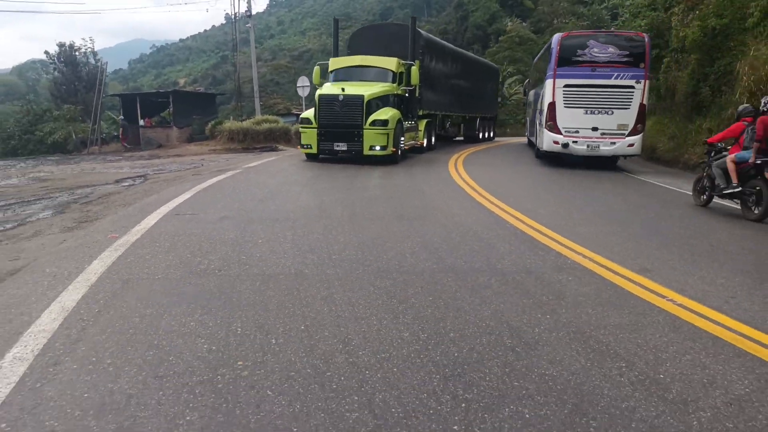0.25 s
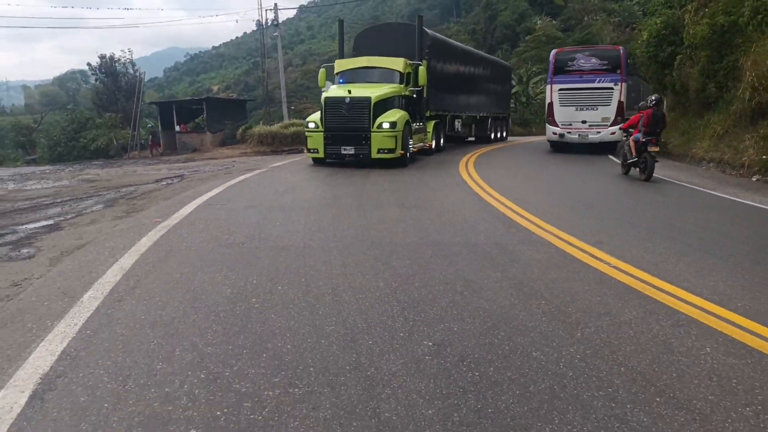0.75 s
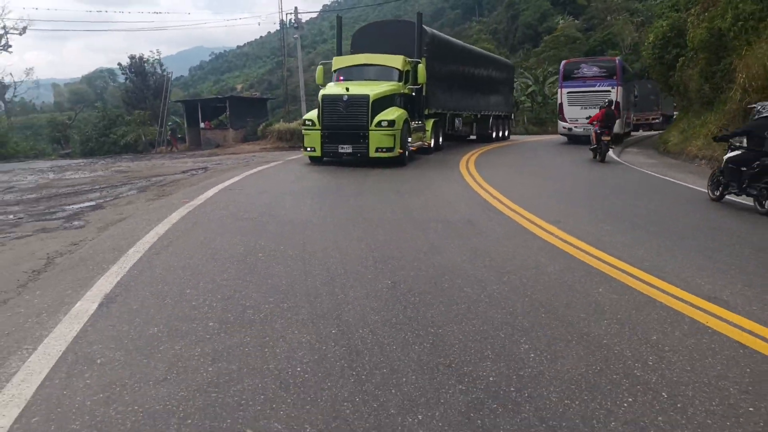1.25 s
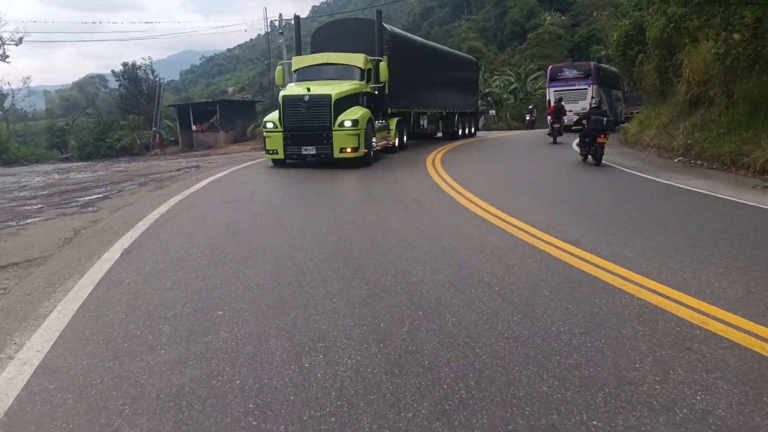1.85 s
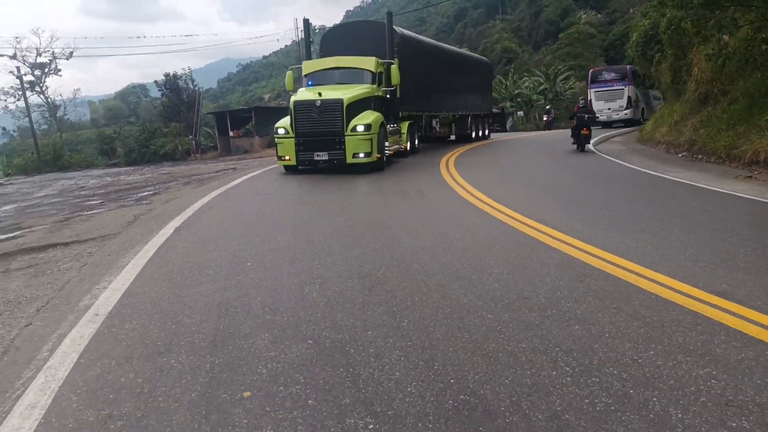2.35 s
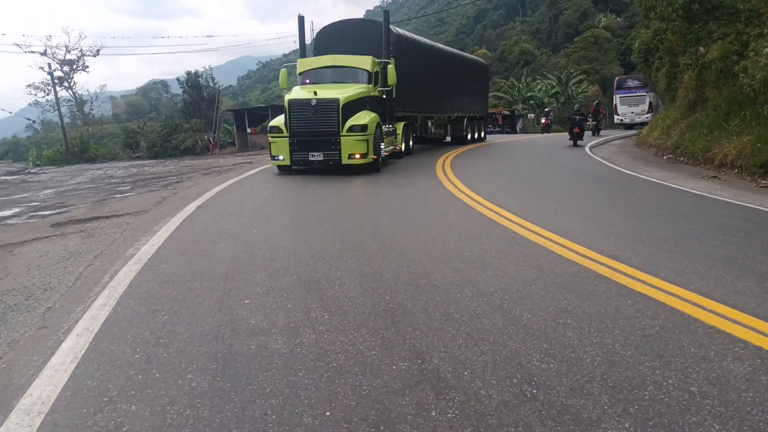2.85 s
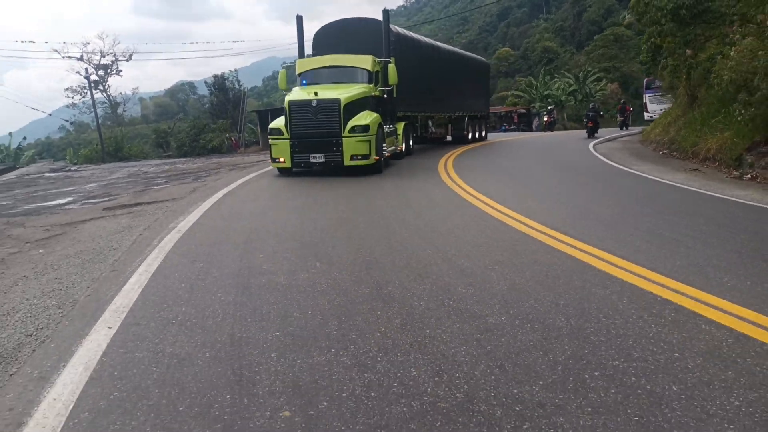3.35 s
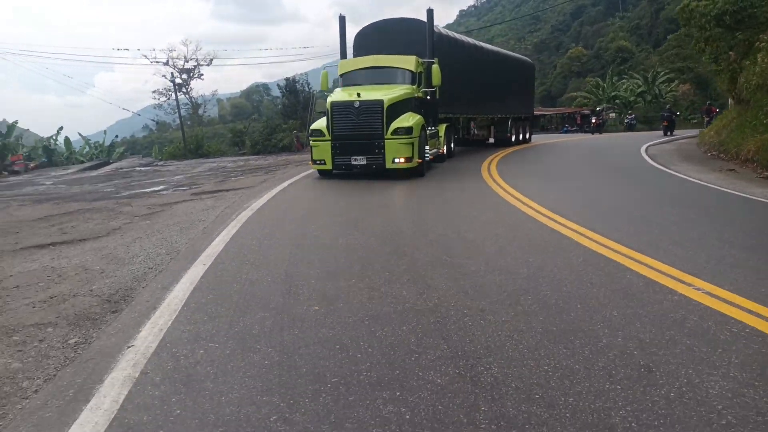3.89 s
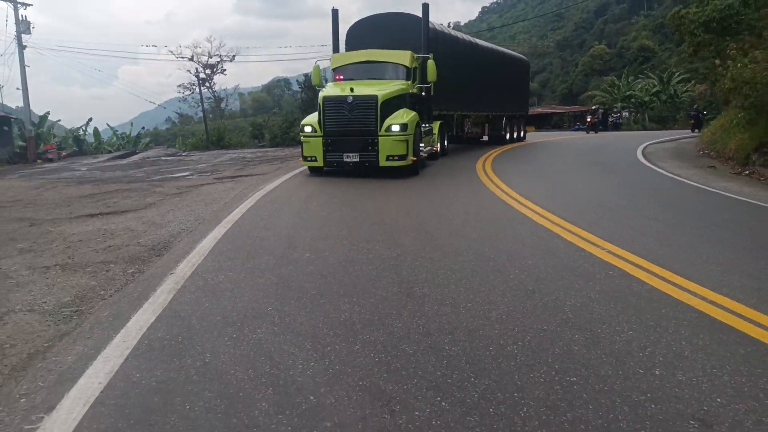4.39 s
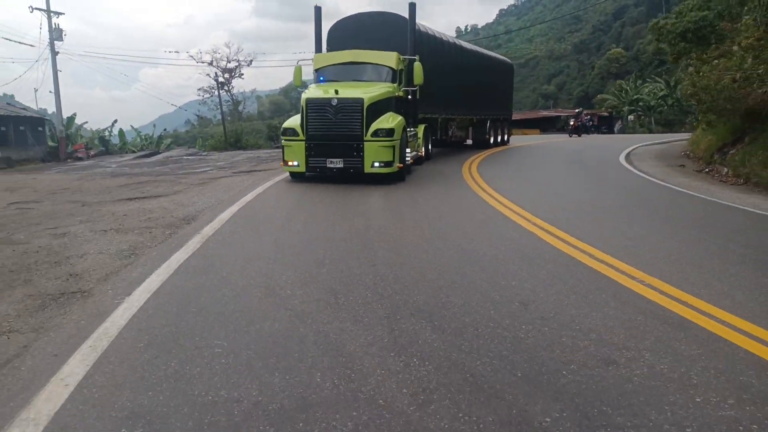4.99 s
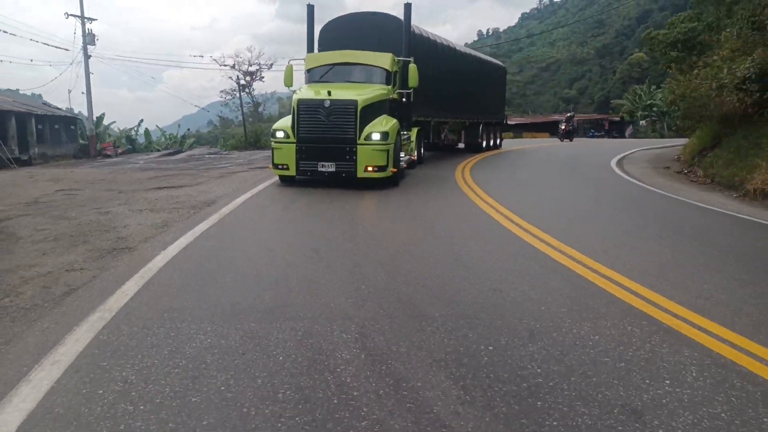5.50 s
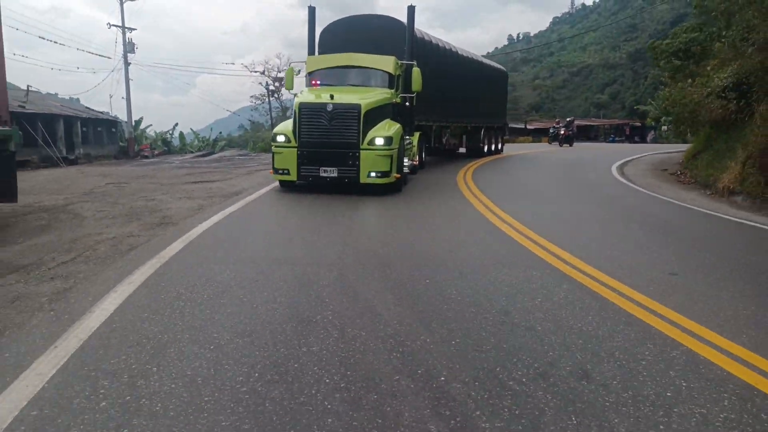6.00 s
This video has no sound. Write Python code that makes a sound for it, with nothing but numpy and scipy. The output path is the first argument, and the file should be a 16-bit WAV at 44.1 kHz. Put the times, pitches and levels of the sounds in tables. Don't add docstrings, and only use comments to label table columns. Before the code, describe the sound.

Outdoors on a mountain road, a loaded diesel truck labours slowly toward a roadside microphone. A coach roars away and two motorbikes buzz past early, then fade. The truck's deep drone and knocking rise steadily in pitch and loudness, with faint turbo whistle and trailer squeaks. Near the end the driver lifts off, air vents with a hiss, a gear clacks, and the engine sags into lumpy gulps.

```python
import sys
import numpy as np
from scipy import signal
from scipy.fft import rfft, irfft
from scipy.io import wavfile
from scipy.ndimage import uniform_filter1d

SR = 44100
rng = np.random.default_rng(int(sys.argv[2]) if len(sys.argv) > 2 else 0)


def unload_wav(signal):
    wavfile.write(
        sys.argv[1],
        SR,
        np.round(np.clip(np.atleast_2d(signal).T, -1, 1) * 32767).astype(np.int16),
    )


def makeup_ratio(level_db):
    decades = np.asarray(level_db, float) / 20
    return 10 ** decades


N = 275184

# (frequency [Hz], density [dB per Hz])
HISS = [(1760, -28.5), (3000, -8), (3370, -25), (4260, -5.5), (5170, -8), (7240, -6), (7870, -6.5),
        (9410, -15), (12800, -15), (15600, -20.5)]
# (frequency [Hz], density [dB per Hz])
RUMBLE = [(15, -50), (25, -40), (54, -46), (92, -1.5), (112, -1.5), (237, -15.5), (362, -16), (492, -19.5),
          (600, -9.5), (780, -46), (1320, -120)]
# (frequency [Hz], density [dB per Hz])
COACH = [(200, 5.5), (300, -1), (420, 1.5), (560, 3.5), (700, -1), (950, 0.5), (1150, -6), (1700, -3),
         (3000, -73), (4000, -85)]
# (frequency [Hz], density [dB per Hz])
TRAFFIC = [(700, -25), (1500, -20), (2300, 11.5), (2900, 10), (3250, 4.5), (3600, 6), (4500, -1.5),
           (6000, -10.5), (10000, -13), (15000, -19)]
# (time of pass [s], level there [dB], time to cover the passing distance [s])
BIKE_PASSES = [
    (.15, -40, 0.39),
    (.65, -42, 0.42),
    (1.13, -43, 0.094),
    (1.55, -46.5, 0.18),
]
# (time [s], frequency [Hz], level [dB])
BIKE_TONES = [
    [(0, 133.5, -41), (.65, 130.7, -31), (.9, 128.9, -58)],
    [(.8, 223.5, -60), (1.1, 222, -42), (1.6, 220, -34.5), (2.0, 217.2, -55)],
]
# (time [s], level [dB], frequency [Hz])
SQUEAKS = [(0.514, -47, 8500), (0.645, -50, 9500), (2.232, -52, 8100), (2.7, -46, 8200), (2.852, -62, 8200),
           (3.02, -60, 8400), (3.165, -52, 8260), (3.28, -58, 8165), (3.41, -57, 8100), (3.52, -54, 8200),
           (5.978, -54, 10200), (6.16, -54, 10200), (6.234, -53, 8500)]
# (time [s], level [dB], frequency [Hz], length [s])
SWISHES = [
    (0.977, -56, 11900, .03),
    (1.13, -59, 12000, .14),
    (1.563, -58, 11970, .07),
    (1.667, -58, 8807, .16),
    (2.2, -58, 12000, .06),
    (5.968, -76, 12360, .03),
    (6.079, -72, 13600, .04),
]
# (delay after the lift [s], level [dB], frequency [Hz], width [Hz], length [s])
VENT = [
    (.096, -46.5, 7600, 2600, .1),
    (.1, -55, 12500, 6000, .07),
    (.28, -53.5, 6800, 3000, .32),
]
# (time [s], level [dB],
# frequency [Hz], width [Hz], length [s])
BARKS = [
    (.62, -32, 2200, 600, .15),
    (1.566, -35, 2300, 500, .3),
    (2.029, -31, 580, 200, .3),
    (1.13, -44, 3740, 600, 0.22),
    (4.253, -32, 2080, 302, 0.32),
    (4.521, -35, 400, 60.33, .4),
    (5.175, -19.5, 2330, 500, 0.024),
]
# (time [s], frequency [Hz], level [dB], spread [Hz])
BRAKE = [
    (1.5, 8150, -80, 150),
    (1.75, 8150, -61, 150),
    (3.3, 8150, -62, 150),
    (3.7, 8150, -80, 150),
]
# (time [s], firing rate [Hz], fuelling [dB])
ENGINE = [(0.0, 54.05, 0.5), (0.25, 54.73, -1.5), (0.6, 55.93, -1.5), (1.1, 57.36, 0.5),
          (1.55, 59.48, -0.5), (2.0, 61.66, 0), (2.8, 64.24, 0.5), (3.7, 69.27, 2), (4.35, 71.98, 0.5),
          (4.95, 74.5, 0.5), (4.97, 71, -10), (5.1, 63.45, -13), (5.36, 58.18, -12), (5.75, 48.24, -15),
          (5.8, 48.14, -27), (5.86, 48.6, -19), (5.97, 54.3, -14.5), (6.24, 55.8, -18)]
# (time [s], extra fuelling [dB])
GULPS = [
    (5.3, 5.5),
    (5.37, 7),
    (5.5, 4.5),
    (5.65, 4),
    (5.72, 1),
    (5.855, 10.5),
    (5.975, 10.5),
    (6.07, 9.5),
    (6.195, 11),
]
# (multiple of the firing rate [1], level under the effort [dB])
UNEVEN = [(1.33, -27), (2.33, -21), (2.67, -24), (3.33, -33), (3.67, -26), (4, -23.5), (4.33, -31.5),
          (4.67, -51), (5.33, -31), (5.67, -37), (6, -41.5), (6.33, -35.5), (6.67, -46), (7.33, -36),
          (8, -28.5), (8.67, -24.5), (9, -25)]
# (frequency [Hz], width [Hz], level [dB])
STACKS = [(53.5, 10.6, -27.5), (72.4, 9.1, -29.5), (106.4, 49, -19.5), (129.6, 29.2, -16.5),
          (164, 7.4, -28), (190.9, 4.7, -32.5), (202.6, 6.7, -31.5), (215.5, 6.45, -33.5)]
# (frequency [Hz], width [Hz], level [dB])
BLOCK = [(578, 39, -1.5), (692, 95, -1.5), (801, 243, -2.5), (1384, 240, 2.5), (2002, 236, -3),
         (2201, 127, -0.5), (2419, 270, -0.5), (2630, 470, -6.5), (1820, 370, -7.5)]
# (frequency [Hz], gain [dB])
KNOCK_TILT = [(300, 21), (500, -2.5), (2700, -1.5), (3300, -9.0), (6000, -20)]
# (frequency [Hz], left minus right [dB])
PORTS = [(60, 10), (200, 10), (700, 9), (1000, 11.5), (1150, 6), (1400, 8.5), (1700, 9), (2100, 7),
         (2500, 11), (2800, 9), (3100, -5.5), (3500, 3.5), (4200, 1.5), (5000, 2.5), (7500, -3),
         (15000, 1.5)]
# (frequency [Hz], common share [0-1])
ALIKE = [(60, .99), (400, .95), (800, .91), (1400, .78), (2400, .68), (3200, .2), (8000, .1)]
# (frequency [Hz], gain [dB])
BASS_CUT = [(25, -22), (40, -19), (45, -5), (56, 0)]

AIR_DB, LANE_HISS_DB, FAN_HISS_DB = -54, -12.5, -24.5
TRUCK_RUMBLE_DB, COACH_RUMBLE_DB = -44.5, -7
COACH_DB, COACH_BEND_S, COACH_BEND_LENGTH_S, COACH_HIDDEN_DB = -31, 2.35, 0.58, -9
TYRES_DB = -13
SQUEAK_WIDTH_HZ, SQUEAK_S, SQUEAK_PAN_DB = 650, .033, -4
SWISH_WIDTH_HZ, SWISH_PAN_DB = 4500, -13
LIFT_S = 4.97
TURBO_HZ, TURBO_HZ_PER_HZ, TURBO_DB, TURBO_SPREAD_HZ = 11900, 105, -64.5, 350
SPOOL_UP_S, SPOOL_UP_DB_PER_S = 2.2, 3
COAST_HZ, COAST_S, COAST_DB, COAST_DB_PER_S, COAST_SPREAD_HZ = 7000, .75, -59.5, -13, 170
COAST_DROP_HZ = 600
WHINE_HZ, WHINE_HZ_PER_HZ, WHINE_DB, WHINE_SPREAD_HZ, WHINE_START_S = 7620, 36, -55, 70, 3.75
GULP_S = 0.035
PIPE_HZ, PIPE_WIDTH_HZ, PIPE_DB = 400, 42, 20
FIRING_OVERRUN, THIRD_OVERRUN = 1.16, 0.84
LOPE_DB, LOPE_FROM_HZ, LOPE_DB_PER_HZ = -39, 67.54, 1.5
TURN_S, TURN_LENGTH_S, TURN_DB = 3.57, 1, 8.5
KNOCK_DB, KNOCK_OVERRUN = -35, 0.2
LAG_S = 0.000978


def curve(table):
    s, *columns = np.transpose(table)
    return [np.interp(np.arange(N) / SR, s, c) for c in columns]


def over_hz(points):
    hz, value = np.transpose(points)
    return np.interp(np.log(np.arange(N // 2 + 1) * SR / N + 1), np.log(hz), value)


def unit(x):
    return x / np.sqrt(np.mean(x ** 2))


def walk(rate):
    k = int(SR / 8 / rate)
    held = np.repeat(rng.standard_normal(N // (8 * k) + 1), k)
    slewed = uniform_filter1d(uniform_filter1d(held, k), k)
    return 1.3 * np.repeat(slewed, 8)[:N]


def ease(middle_s, length_s):
    return .5 + .5 * np.tanh((np.arange(N) / SR - middle_s) / length_s)


def together(*levels_db):
    return 10 * np.log10(sum(makeup_ratio(2 * db) for db in levels_db))


def panned(db, pan_db):
    return makeup_ratio(db + np.array([[pan_db], [-pan_db]]) / 2)


def resonance(hz, centre_hz, width_hz):
    return 1 / (1 + 2j * (hz - centre_hz) / width_hz)


def resonances(hz, modes):
    return sum(abs(makeup_ratio(db) * resonance(hz, f, w) ** 2) ** 2 for f, w, db in modes)


def pair():
    one, other = rfft(rng.standard_normal((2, N)))
    share = np.clip(over_hz(ALIKE), 0, 1)
    return np.array([one, share * one + np.sqrt(1 - share ** 2) * other])


def roar(spectrum, db, flicker_db, rate):
    colour = pair() * makeup_ratio(over_hz(spectrum))
    high = over_hz([(spectrum[0][0], 0), (spectrum[-1][0], 1)])
    swell = walk(rate / 5)
    out = 0
    for weight in (high, 1 - high):
        flicker = makeup_ratio(flicker_db * (walk(rate) + swell))
        out = out + irfft(colour * np.sqrt(weight), N) * flicker
    return makeup_ratio(db) * unit(out)


def whistle(hz, db, spread_hz, pan_db, overtone_db):
    phase = np.array([2 * np.pi * np.cumsum(hz + spread_hz * walk(400)) / SR for _ in range(2)])
    level = panned(db + 2.0 * walk(30), pan_db)
    return level * (np.sin(phase) + makeup_ratio(overtone_db) * np.sin(2 * phase))


def air_hiss(bikes_db, knock_db):
    db = together(AIR_DB, bikes_db + LANE_HISS_DB, knock_db + FAN_HISS_DB)
    return roar(HISS, db + 3, .5, 14) * makeup_ratio(.8 * walk(45))


def hillside_rumble(coach_db, facing_db):
    db = together(coach_db + COACH_RUMBLE_DB, TRUCK_RUMBLE_DB + facing_db)
    return roar(RUMBLE, db + 7.5, 0.11, 11.0)


def traffic_roar(bikes_db):
    return roar(TRAFFIC, together(bikes_db, KNOCK_DB + TYRES_DB) + 5.5, 0.89, 10)


def bike_tones():
    out = 0
    for hz, db in map(curve, BIKE_TONES):
        phase = 2 * np.pi * np.cumsum(hz + 2.24 * walk(16)) / SR
        out = out + np.sqrt(2) * makeup_ratio(db + 2 * walk(6.9)) * np.sin(phase)
    return out


def puffs():
    size = 32768
    out, t, hz = np.zeros((2, N)), np.arange(N) / SR, np.arange(size // 2 + 1) * SR / size
    rows = [(s, db, f, SQUEAK_WIDTH_HZ, SQUEAK_S, SQUEAK_PAN_DB) for s, db, f in SQUEAKS]
    rows += [(s, db, f, SWISH_WIDTH_HZ, length, SWISH_PAN_DB) for s, db, f, length in SWISHES]
    rows += [(LIFT_S + s, db, f, w, length, SQUEAK_PAN_DB) for s, db, f, w, length in VENT]
    rows += [(*row, 0) for row in BARKS]
    for s, db, centre_hz, width_hz, length, pan_db in rows:
        start = int(s * SR) - size // 2
        noise = rfft(rng.standard_normal((2, size)))
        band = unit(irfft(noise * resonance(hz, centre_hz, width_hz) ** 2))
        span = slice(start, min(start + size, N))
        swell = np.exp(-(2 * (t[span] - s) / length) ** 2)
        out[:, span] += panned(db, pan_db) * band[:, :len(swell)] * swell
    return out


def brake():
    return whistle(*curve(BRAKE), -6, -120)


def turbo(hz):
    t = np.arange(N) / SR
    since, pulling = np.maximum(t - LIFT_S, 0), t < LIFT_S
    climb = TURBO_HZ + TURBO_HZ_PER_HZ * (hz - 60)
    coast = COAST_HZ + (climb.max() - COAST_DROP_HZ - COAST_HZ) * np.exp(-since / COAST_S)
    climb_db = TURBO_DB - SPOOL_UP_DB_PER_S * np.maximum(SPOOL_UP_S - t, 0)
    db = np.where(pulling, climb_db, COAST_DB + COAST_DB_PER_S * since)
    spread_hz = np.where(pulling, TURBO_SPREAD_HZ, COAST_SPREAD_HZ)
    blades = whistle(np.where(pulling, climb, coast), db, spread_hz, -8, -120)
    boost = ease(WHINE_START_S, .2) * (1 - ease(LIFT_S, .02))
    whine_hz = WHINE_HZ + WHINE_HZ_PER_HZ * (hz - 69)
    return blades + boost * whistle(whine_hz, WHINE_DB, WHINE_SPREAD_HZ, -2, -18)


def knock(phase, db):
    cycle = phase / (2 * np.pi)
    size = makeup_ratio(2.0 * rng.standard_normal(N // 100))[cycle.astype(int)]
    burst = 1 + .9 * size * np.exp(-(cycle % 1) / .35)
    hz = np.arange(N // 2 + 1) * SR / N
    body = np.sqrt(resonances(hz, BLOCK)) * makeup_ratio(over_hz(KNOCK_TILT))
    shaken = burst * irfft(pair(), N)
    return makeup_ratio(db) * unit(irfft(rfft(shaken) * body, N))


def stack_tones(hz, fuel_db):
    first, second, third = (10 * np.log10(resonances(n * hz, STACKS)) for n in (1, 2, 3))
    lope = LOPE_DB + LOPE_DB_PER_HZ * np.maximum(hz - LOPE_FROM_HZ, 0) + THIRD_OVERRUN * fuel_db
    return [first + FIRING_OVERRUN * fuel_db, second + fuel_db, third + THIRD_OVERRUN * fuel_db, lope]


def exhaust(hz, phase, tones_db):
    out = 0
    for thirds, db in zip((3, 6, 9, 5), tones_db):
        level = np.sqrt(2) * makeup_ratio(db + .6 * walk(25))
        out = out + level * np.sin(thirds * phase / 3 + .08 * walk(20))
    effort = np.sqrt(uniform_filter1d(makeup_ratio(2 * tones_db[0]) + makeup_ratio(2 * tones_db[1]), size=4000))
    for multiple, db in UNEVEN:
        thirds = round(3 * multiple)
        detuning = 2 * (hz * thirds / 3 - PIPE_HZ) / PIPE_WIDTH_HZ
        lift = 1 + makeup_ratio(PIPE_DB) / (1 + detuning ** 2) ** 2
        waver = 1 + .2 * walk(8)
        tone = np.sin(thirds * phase / 3 + .35 * walk(9) + thirds ** 2)
        out += makeup_ratio(db) * effort * lift * waver * tone
    return out


def scene():
    t = np.arange(N) / SR
    hz, fuel_db = curve(ENGINE)
    phase = 2 * np.pi * np.cumsum(hz) / SR
    fuel_db = fuel_db + sum(db * np.exp(-((t - s) / GULP_S) ** 2) for s, db in GULPS)
    facing_db = TURN_DB * ease(TURN_S, TURN_LENGTH_S)
    knock_db = KNOCK_DB + facing_db + KNOCK_OVERRUN * uniform_filter1d(fuel_db, size=4000)
    bikes_db = together(*(db - 10 * np.log10(1 + ((t - s) / away_s) ** 2) for s, db, away_s in BIKE_PASSES))
    coach_db = COACH_DB + COACH_HIDDEN_DB * ease(COACH_BEND_S, COACH_BEND_LENGTH_S)
    background = air_hiss(bikes_db, knock_db) + hillside_rumble(coach_db, facing_db)
    coach = roar(COACH, coach_db + 6.5, 0.44, 11.0)
    lane = coach + traffic_roar(bikes_db) + bike_tones()
    engine = knock(phase, knock_db + 4.5) + exhaust(hz, phase, stack_tones(hz, fuel_db))
    return background + lane + puffs() + brake() + turbo(hz) + engine


def roll_off(x):
    return signal.sosfilt(signal.butter(12, 15700, fs=SR, output="sos"), x)


def record(dry):
    balance = makeup_ratio(over_hz(PORTS))
    late = np.exp(-2j * np.pi * np.arange(N // 2 + 1) * SR / N * LAG_S)
    ports = np.array([balance * late, np.ones_like(late)]) * 1.469 / np.sqrt(1 + balance ** 2)
    ports *= makeup_ratio(over_hz(BASS_CUT))
    heard = irfft(rfft(dry) * ports, N)
    mix = np.tanh(1.074 * heard) / 1.16
    return roll_off(mix)


dry = scene()
out = record(dry)
unload_wav(out)
```